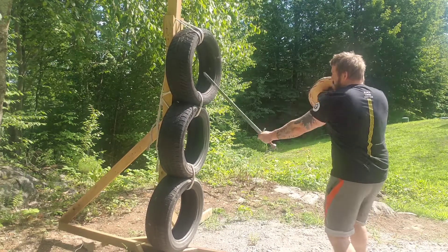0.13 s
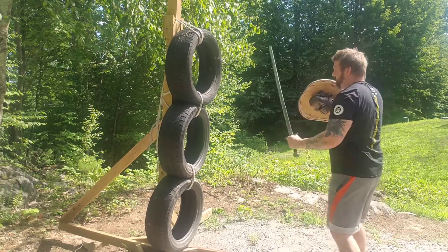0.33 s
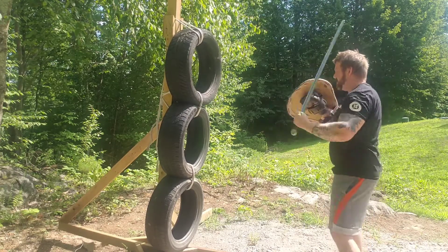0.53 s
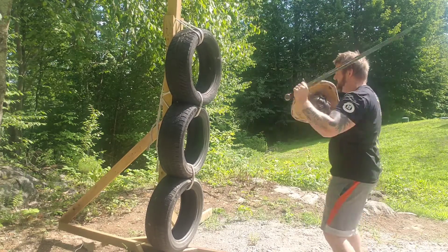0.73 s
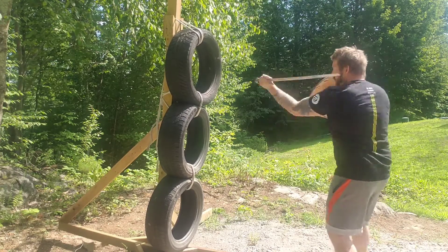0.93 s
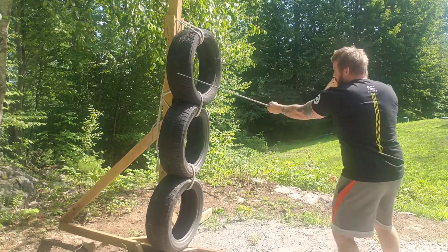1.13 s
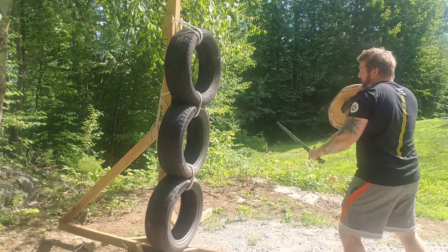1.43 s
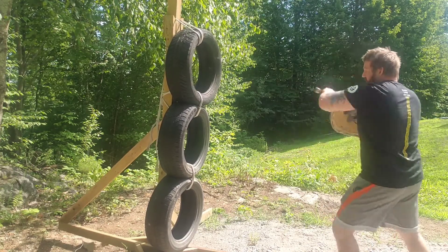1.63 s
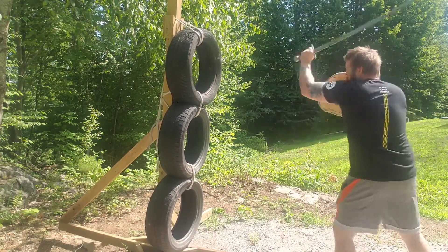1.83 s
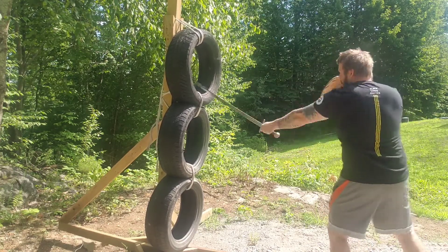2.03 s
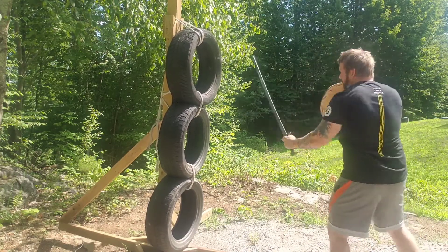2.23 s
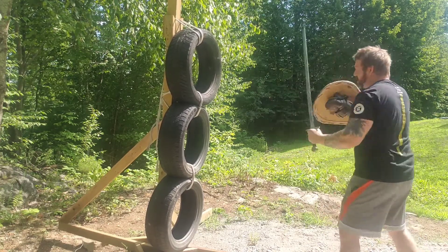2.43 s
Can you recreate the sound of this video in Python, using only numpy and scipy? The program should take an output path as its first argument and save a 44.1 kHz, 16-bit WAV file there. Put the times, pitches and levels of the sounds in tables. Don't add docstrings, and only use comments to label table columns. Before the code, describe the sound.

A steel sword strikes hanging rubber tyres at about 0.2, 1.2 and 2.2 seconds. Each blow is a loud, slightly overloaded slap with a hollow, quickly damped boom, a thin blade shimmer, a brief frame rattle and a diffuse echo from trees. The middle blow is duller and deeper, with an immediate softer rebound. Between them come faint gear ticks, gritty foot scuffs, quiet leaf hiss, thin insects and low distant engines.

```python
import sys
import numpy as np
from scipy import signal
from scipy.fft import rfft, irfft, next_fast_len
from scipy.io import wavfile
from scipy.ndimage import map_coordinates

SR = 44100
rng = np.random.default_rng(int(sys.argv[2]) if len(sys.argv) > 2 else 0)


def waveform_to_disk(signal):
    frames = np.transpose(np.atleast_2d(signal))
    scaled = np.clip(frames, -1, 1) * 32767
    samples = np.round(scaled).astype(np.int16)
    wavfile.write(sys.argv[1], SR, samples)


def voltage_ratio(level):
    return 10 ** (np.asarray(level, float) / 20)


N = 114660

# start_s, level_db, spot (0 upper, 1 middle, 2 rebound; whole part counts), crack_db, blade_ring
BLOWS = [
    (0.2239, -1.5, 0, -18.5, 0),
    (1.2218, -2, 1.017, -23.5, 1),
    (1.2534, -11, 2, -56, 1),
    (2.1637, -2.5, 0.42, -20, 2),
]
SCENE_TILT_DB = -4.5


def unit(x):
    return x / np.sqrt(np.mean(x ** 2) + 1e-20)


def along(points, hz):
    f, v = np.transpose(points)
    return np.interp(np.log(hz + 1), np.log(f + 1), v)


def filtered(x, response):
    m = next_fast_len(x.shape[-1] + 8192)
    spectrum = rfft(x, m) * response(np.fft.rfftfreq(m, 1 / SR))
    return irfft(spectrum, m)[..., :x.shape[-1]]


def noise(gain, size, channels=1):
    return unit(filtered(rng.standard_normal((channels, size)), gain))


def wobble(rate):
    knots = rng.standard_normal(int(N * rate / SR) + 4)
    return map_coordinates(knots, [np.arange(N) * rate / SR])


def add(out, s, x):
    i = round(s * SR)
    out[..., i:i + x.shape[-1]] += x[..., :out.shape[-1] - i]


def fade(t, t60, attack):
    return voltage_ratio(-60 * t / t60) * (1 - np.exp(-t / attack))


def placed(x):
    # frequency_hz, level_db
    tilt = [(60, -2), (380, -4), (1290, -1), (2380, -2), (8000, -15), (15000, -9.5)]
    # frequency_hz, phase_rad
    lead = [(300, 0), (1000, 1), (3270, -1.5), (4310, -4), (5340, 1), (8350, 4), (12900, -11.5),
            (16000, 15)]
    side = np.array([[.5], [-.5]])
    return filtered(x, lambda hz: voltage_ratio(side * along(tilt, hz)) * np.exp(1j * side * along(lead, hz)))


def alike(pair):
    # frequency_hz, left_right_correlation
    likeness = [(60, 0.85), (300, 0.92), (640, 0.32), (1400, -0.11), (3770, -0.11)]

    def turn(hz):
        return np.arccos(np.clip(along(likeness, hz), -1, 1)) / 2

    mid, side = filtered(pair, lambda hz: np.array([np.cos(turn(hz)), np.sin(turn(hz))]))
    return np.array([mid + side, mid - side]) * voltage_ratio(SCENE_TILT_DB * np.array([[.5], [-.5]]))


def leaf_hiss():
    # frequency_hz, level_db
    air_tone = [(88, -46.5), (150, -18.5), (770, -11.5), (838, -13), (977, -13.5), (1770, -25),
                (4020, -29.5), (4850, -19.5), (5900, -21), (7000, -14), (9500, -14.5)]
    edge_hz, above_db = 8950, -29

    def tone(hz):
        return np.where(hz < edge_hz, voltage_ratio(along(air_tone, hz)), voltage_ratio(above_db)) * (hz > 100)

    air = alike(noise(tone, N, channels=2))
    return voltage_ratio(-66 + 1.2 * wobble(6.3)) * air


def insects():
    # frequency_hz, level_db
    songs = [(4802, -83.5), (4974, -92), (6616, -90), (6848, -82)]
    t, out = np.arange(N) / SR, np.zeros((2, N))
    for hz, db in songs:
        phase = 2 * wobble(33) + rng.uniform(0, 2 * np.pi, (2, 1))
        out += voltage_ratio(db + 5 * wobble(6)) * np.sin(2 * np.pi * hz * t + phase)
    return out


def far_engines():
    # resonance_hz, width_hz, level_db
    engines = [(60, 5.5, -2.5), (90.2, 10, -8), (119.6, 4.7, -7), (41, 5.4, -7.5)]
    # time_s, level_db
    drone_level = [(0, -57), (.2, -60), (.5, -58.5), (.72, -61), (.85, -65.5), (1, -67.5), (1.12, -56),
                   (1.5, -54.5), (1.66, -63), (1.8, -57.5), (2.1, -58.5), (2.3, -50), (2.4, -58.5),
                   (2.6, -59.5)]

    def tone(f):
        return abs(sum(voltage_ratio(db) * (f * w / (c * c - f * f + 1j * f * w)) ** 2 for c, w, db in engines))

    common, opposed = noise(tone, N, channels=2)
    level = voltage_ratio(np.interp(np.arange(N) / SR, *np.transpose(drone_level)))
    return level * (common * voltage_ratio([[-1.5], [1.5]]) + 0.16 * opposed * [[1], [-1]])


def ticks():
    # start_s, level_db, pitch_hz, t60_s, crack_db
    knocks = [(0.046, -45, 550, 0.021, -60), (.058, -46, 590, .02, -71), (.071, -47, 630, .025, -71),
              (0.092, -35, 504, 0.017, -60), (.1, -41, 500, 0.034, -66), (.139, -44.5, 590, 0.013, -56),
              (.544, -56, 1030, 0.021, -80), (0.553, -53, 1060, 0.016, -80), (.6, -42.5, 1310, 0.011, -68),
              (.613, -51, 1510, 0.0085, -70), (0.621, -46.5, 1000, 0.037, -75),
              (.936, -57, 1667, 0.0089, -75), (1.415, -56, 6000, .012, -62), (1.498, -47, 6300, .01, -49),
              (1.602, -45, 664, 0.09, -66), (1.604, -41, 910, 0.031, -75), (1.665, -54.5, 389, 0.39, -98),
              (1.758, -52, 1500, 0.011, -77), (1.861, -43.5, 640, 0.013, -58),
              (1.872, -45, 900, 0.011, -61), (1.934, -52, 2000, 0.0095, -64),
              (1.952, -35, 1400, 0.011, -43.5), (2.104, -53, 2494, 0.008, -68),
              (2.462, -48, 706, .012, -60)]
    attack_s, crack_t60_s = .0003, .008
    out, t = np.zeros(N), np.arange(SR // 4) / SR
    for s, db, hz, t60, crack_db in knocks:
        crack = noise(lambda f: (f > 700) / (1 + (f / 8000) ** 2), len(t))[0]
        mode = voltage_ratio(db) * fade(t, t60, attack_s) * np.sin(2 * np.pi * hz * t)
        add(out, s, mode + voltage_ratio(crack_db) * fade(t, crack_t60_s, attack_s) * crack)
    return out * voltage_ratio(SCENE_TILT_DB * np.array([[.5], [-.5]]))


def scuffs():
    # start_s, length_s, level_db, brightness_db (per octave above 1 kHz), peak_exponent (low peaks early)
    strokes = [(0.043, .105, -53.5, -7.5, 0.46), (0.146, .07, -67, -8.5, .6), (1.054, 0.2, -67.5, -3, 0.54),
               (1.125, .04, -59.5, -7.5, .6), (1.339, 0.13, -49.5, -5.5, 1.1),
               (1.43, 0.12, -61.5, -1.5, 1.1), (1.55, 0.16, -55, -4, .7), (1.852, .065, -51.5, -5, 0.62),
               (1.91, 0.043, -57, -4.5, 0.74), (1.945, 0.12, -54, -5, 0.57),
               (2.05, 0.14, -68.5, -2.5, 0.51), (2.44, 0.036, -46.5, -5, 1.3), (2.47, .03, -58, -5.5, 0.55),
               (2.489, 0.0088, -51, -1.5, 0.88)]
    # frequency_hz, level_db
    grit = [(120, -46), (200, -13.5), (880, -11), (1310, -8), (2300, -9), (3870, -12.5), (7000, -10.5),
            (15000, -16.5)]
    out = np.zeros((2, N))
    for s, length, db, bright_db, early in strokes:
        n = round(length * SR)
        big_grains = (rng.random(n) < .03) * rng.random(n)
        clumps = voltage_ratio(2 * wobble(220)[:n])
        grains = rng.standard_normal((2, n)) * (.5 + 2 * big_grains) * clumps
        tone = lambda hz: voltage_ratio(along(grit, hz) + bright_db * np.log2((hz + 1) / 1000).clip(0))
        stroke = np.sin(np.pi * (np.arange(n) / n) ** early)
        add(out, s, voltage_ratio(db) * stroke * unit(alike(filtered(grains, tone))))
    return out


def swish():
    centre_hz, length_s, level_db = 1400, .05, -68
    out, n = np.zeros(N), round(length_s * SR)
    for s, _, spot, *_ in BLOWS:
        puff = noise(lambda f: 1 / (1 + ((f - centre_hz) / 200) ** 2), n)[0]
        add(out, s - length_s, (spot < 2) * voltage_ratio(level_db) * np.arange(n) / n * puff)
    return placed(out)


def trees_echo():
    # frequency_hz, t60_s
    decay = [(100, 0.67), (1000, 1.377), (2000, .9), (3500, .75), (5000, 0.98), (12000, 0.77)]
    # frequency_hz, level_db
    echo_tone = [(88, -30.5), (150, -4.5), (265, -3.5), (318, -19), (382, -2.5), (662, -12), (1030, -6.5),
                 (1880, -21), (5450, -19), (12000, -35.5), (15600, -69), (22000, -120)]
    hollow_hz, hollow_width_hz, hollow_gain = 1040, 33, 0.58

    def tone(f):
        hollow = hollow_gain / (1 + ((f - hollow_hz) / hollow_width_hz) ** 2)
        return voltage_ratio(along(echo_tone, f)) * (1 + hollow)

    hz, u, z = signal.stft(alike(noise(tone, SR, channels=2)), SR, nperseg=256)
    z = z * voltage_ratio(-60 * u / along(decay, hz)[:, None])
    tail = signal.istft(z, SR, nperseg=256)[1][:, :SR]
    return voltage_ratio(-37.5) * tail * (1 - np.exp(-np.arange(SR) / SR / 0.027))


def frame_shake(t):
    # frequency_hz, level_db
    shake_tone = [(35, -45.5), (60, -2.5), (146, -28), (237, -7), (319, -19.5), (396, -2.5), (501, -18),
                  (1080, -16.5), (2500, -44), (3250, -71), (5500, -120)]
    return voltage_ratio(-14.5) * fade(t, 0.2, 0.00093) * noise(lambda hz: voltage_ratio(along(shake_tone, hz)), SR)[0]


def crack_and_rattle(t, crack_db):
    # frequency_hz, level_db
    spray = [(880, -35), (1500, -8), (2490, -10), (3380, -7), (6120, -9), (7610, -10.5), (16000, -7)]
    dull_hz = 9500
    hiss = noise(lambda hz: voltage_ratio(along(spray, hz)), SR, channels=3)
    crack = voltage_ratio(crack_db) * fade(t, .06, 0.0036) * hiss[0]
    spread = hiss[1:] + placed(hiss[0, ::-1])
    dulled = filtered(spread, lambda f: 1 / (1 + (f / dull_hz) ** 2))
    rattle = voltage_ratio(crack_db - 3.5 + 2 * wobble(40)[:SR]) * fade(t, 0.25, 0.00075) * dulled
    return crack, rattle


def blade_ring(t, ring):
    blade_hz = [3278, 3908, 4292, 4312, 4780, 4826, 5324, 5370, 5825, 5930, 6320, 6815, 7074, 7220, 7352,
                7570, 7750, 7865]
    # t60_s, level_db in ring 0, level_db in ring 1, level_db in ring 2
    blade_modes = [(0.27, -39.5, -50, -68.5), (.36, -57, -56.5, -44), (.56, -43, -58, -53.5),
                   (0.3, -47, -60.5, -43.5), (0.4, -60, -44, -63), (0.55, -50.5, -56, -44.5),
                   (0.64, -47.5, -60, -50.5), (0.41, -47.5, -60, -41.5), (0.21, -45.5, -51.5, -39),
                   (.35, -52.5, -59.5, -43), (0.38, -44, -56, -48.5), (0.27, -57.5, -57.5, -44),
                   (0.27, -58, -59, -41.5), (0.55, -49.5, -52, -52.5), (0.54, -46, -53.5, -45),
                   (0.22, -51.5, -43, -54.5), (.35, -51, -53, -42.5), (0.14, -30.5, -59, -38)]
    drift_rad = .028
    out = np.zeros((2, SR))
    for hz, (t60, *levels) in zip(blade_hz, blade_modes):
        start = rng.uniform(0, 2 * np.pi) + rng.normal(0, 0.6, (2, 1))
        turn = start + drift_rad * np.cumsum(rng.standard_normal(SR))
        level = voltage_ratio(levels[ring] + 2 + 2.5 * wobble(38)[:SR])
        out += level * fade(t, t60, 0.0018) * np.sin(2 * np.pi * hz * t + turn)
    return out


def tread_slap(t, spot):
    slap_hz, hold_s, slap_db = [1060.4, 1000, 1000], [0.0069, 0.001, .001], [-1.5, -6.5, -29]
    released = np.maximum(t - hold_s[spot], 0)
    held = voltage_ratio(slap_db[spot] - 60 * released / 0.0072) * (1 - np.exp(-t / 0.0005))
    return held * np.sin(2 * np.pi * slap_hz[spot] * t)


def carcass_boom(t, spot):
    # pitch_hz, level_db, t60_s
    upper = [(86.1, -14.5, 0.19), (212, -13.5, 0.03), (253.3, -3, 0.072), (268.7, -25.5, 0.29),
             (390.3, -10, 0.26), (453, -10, 0.06), (567.7, -16, 0.088), (744, -9.5, 0.038),
             (878, -2.5, 0.016), (1216, -14, 0.01), (1307, -16, 0.12), (1416, -13.5, 0.038),
             (1626, -10.5, 0.023)]
    # pitch_hz, level_db, t60_s
    middle = [(75.4, -10, 0.12), (249.5, 3.5, 0.051), (290.9, 4.5, 0.043), (389.8, -5.5, 0.17),
              (549, -8, 0.041), (722, -3, 0.026), (857, -25, 0.064), (1125, -1.5, 0.019),
              (1332, -14, 0.072)]
    # pitch_hz, level_db, t60_s
    rebound = [(111, -17.5, 0.37), (218, 3, 0.085), (258, -16.5, 0.32), (316, 5, 0.04), (379, -3.5, 0.21),
               (602, -5.5, 0.061), (700, -20.5, 0.44), (1210, -6, 0.026)]
    bloom = [0.31, 0.86, 0.13]
    out = np.zeros(SR)
    for hz, db, t60 in (upper, middle, rebound)[spot]:
        out += voltage_ratio(db) * fade(t, t60, bloom[spot] / hz) * np.sin(2 * np.pi * hz * t)
    return out


def ground_and_port(hz):
    delay_s, gain, low_hz = .0035, 0.38, 63
    ground = (1 + gain * np.exp(-2j * np.pi * hz * delay_s)) / (1 + gain / 2)
    return (hz / (hz - 1j * low_hz)) ** 2 * ground


def sword():
    first_move = [-1, -1, 1]
    trees_delay_s = .03
    near, wide, t = np.zeros(N), np.zeros((2, N)), np.arange(SR) / SR
    for s, db, spot, crack_db, ring in BLOWS:
        spot, ring = int(spot), int(ring)
        body = carcass_boom(t, spot) - tread_slap(t, spot) + frame_shake(t)
        crack, rattle = crack_and_rattle(t, crack_db)
        add(near, s, first_move[spot] * voltage_ratio(db) * body + crack)
        add(wide, s, rattle)
        if spot < 2:
            add(wide, s, blade_ring(t, ring))
        add(wide, s + trees_delay_s, voltage_ratio(db) * trees_echo())
    return filtered(placed(near), ground_and_port) + wide


def scene():
    woodland = leaf_hiss() + insects() + far_engines()
    return woodland + ticks() + scuffs() + swish() + sword()


def top_cut(x):
    return signal.sosfilt(signal.butter(12, 16490, fs=SR, output="sos"), x)


def record(dry):
    clip_top, top_hz = 1.25, 16000
    clipped = dry / (1 + abs(dry / clip_top) ** 6) ** (1 / 6)
    mix = filtered(clipped, lambda hz: 1 / (1 + (hz / top_hz) ** 40))
    return top_cut(mix)


dry = scene()
out = record(dry)
waveform_to_disk(out)
```